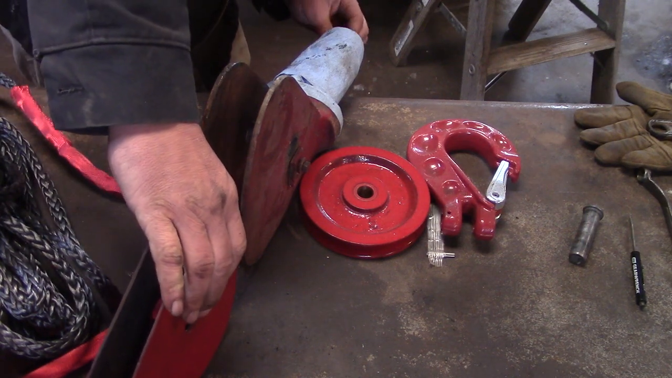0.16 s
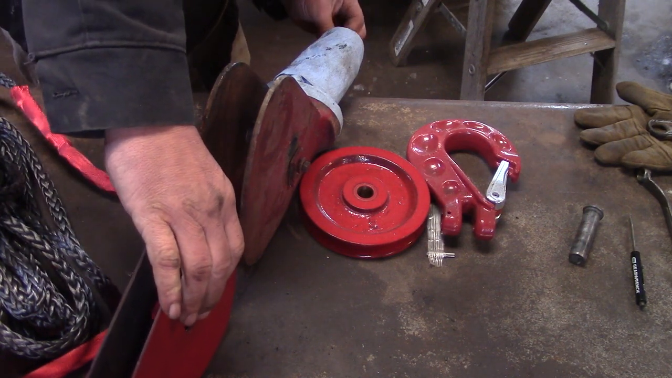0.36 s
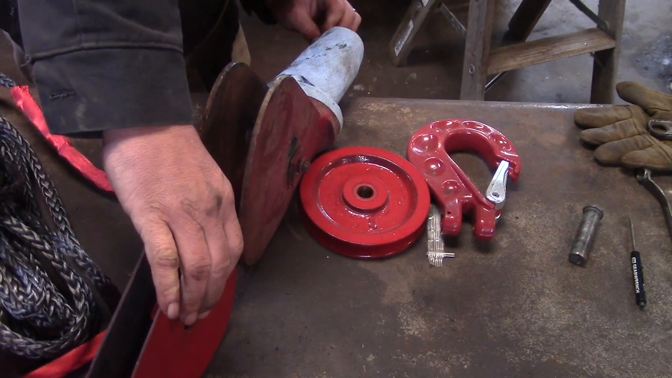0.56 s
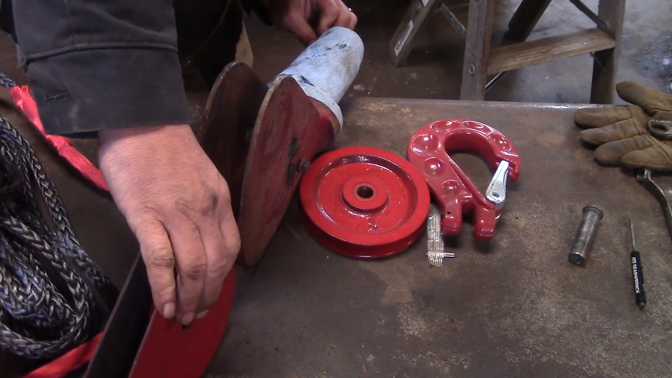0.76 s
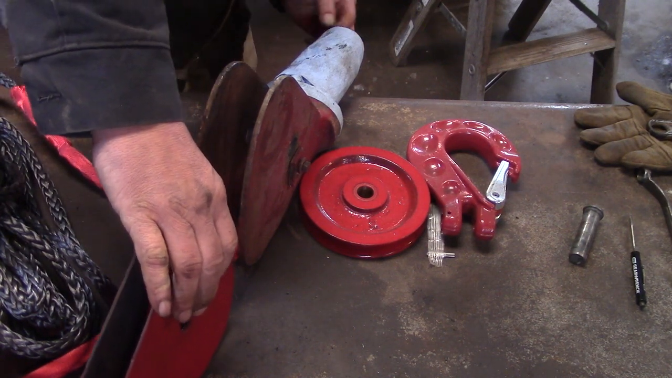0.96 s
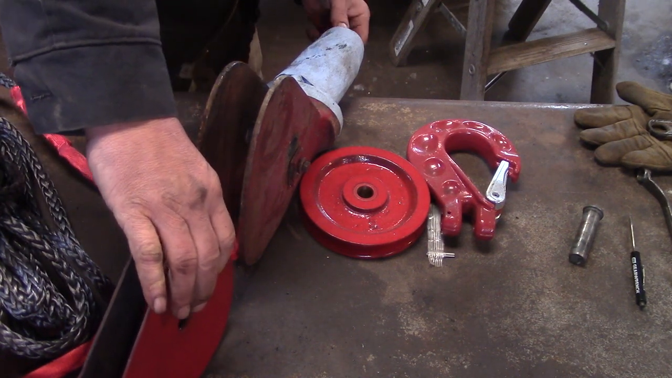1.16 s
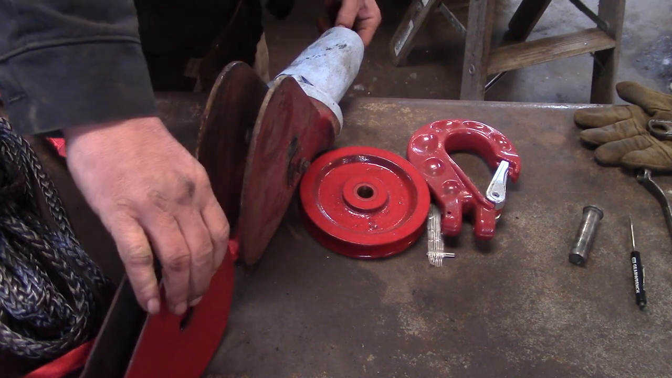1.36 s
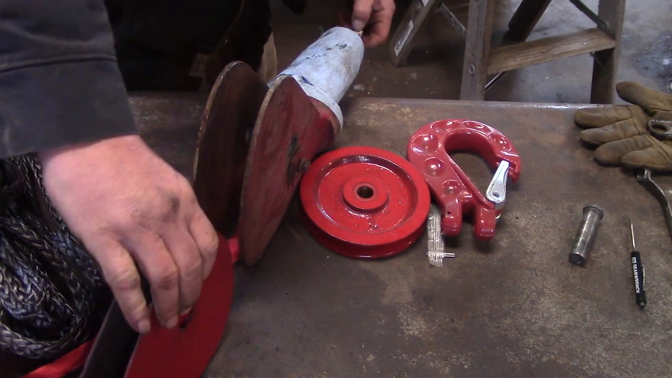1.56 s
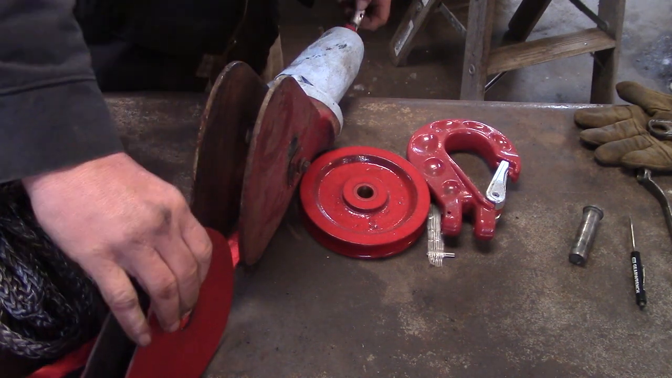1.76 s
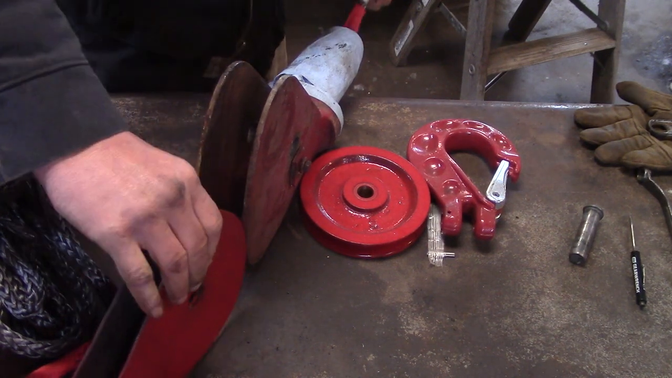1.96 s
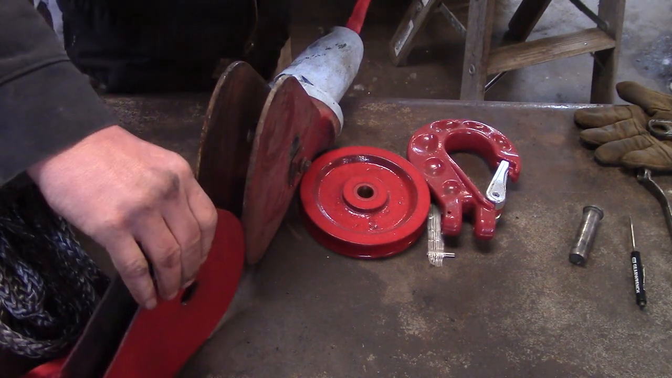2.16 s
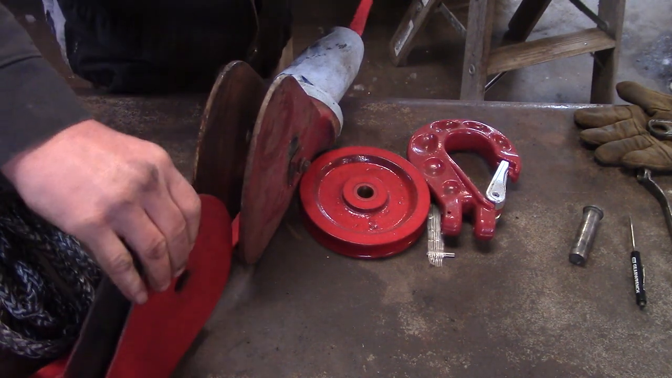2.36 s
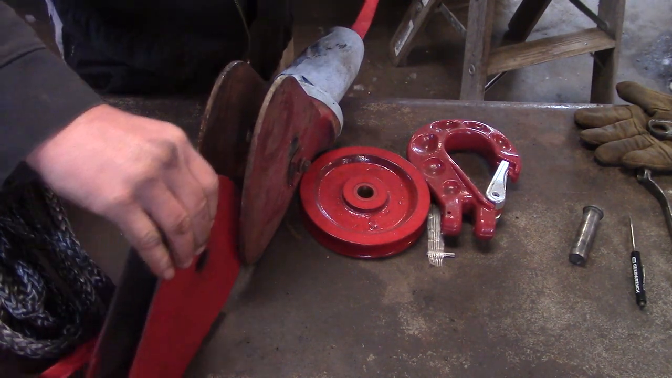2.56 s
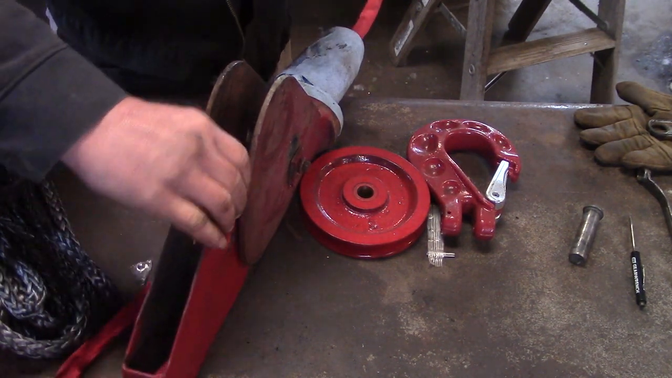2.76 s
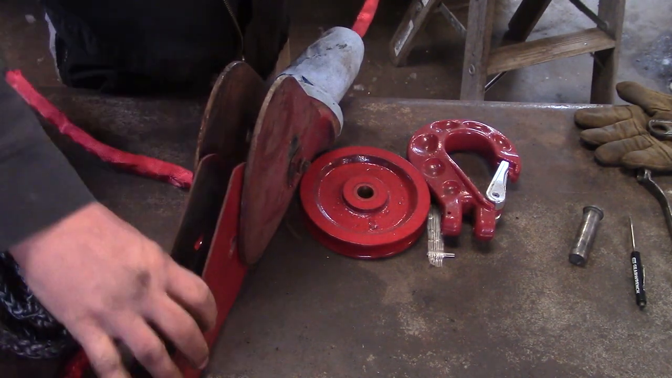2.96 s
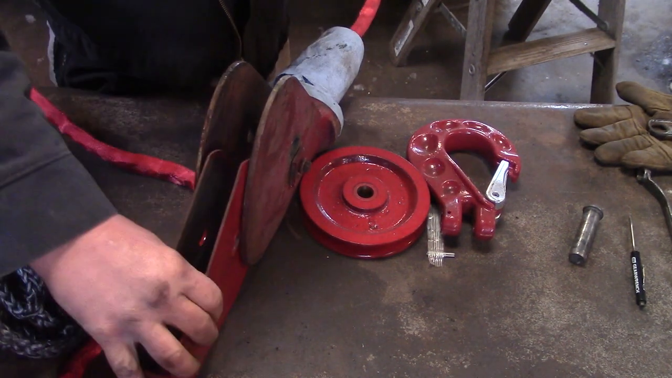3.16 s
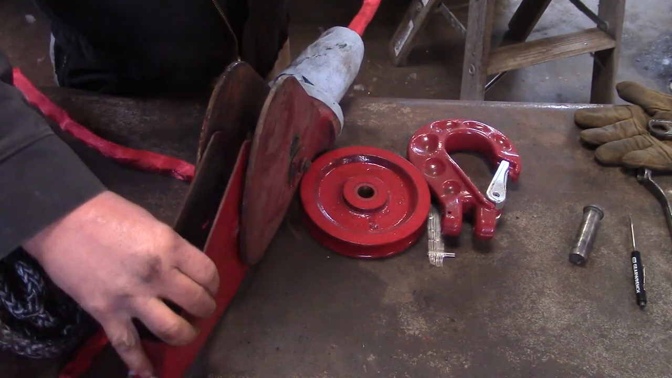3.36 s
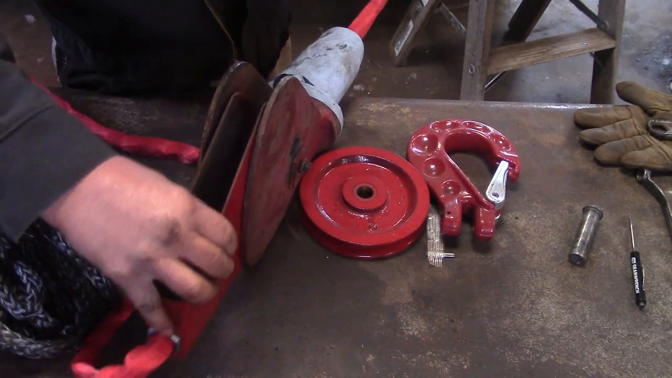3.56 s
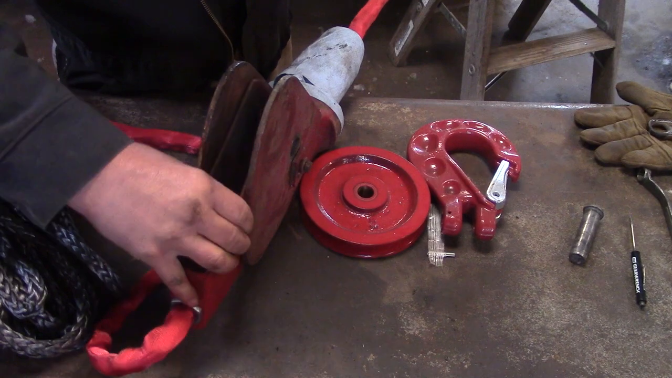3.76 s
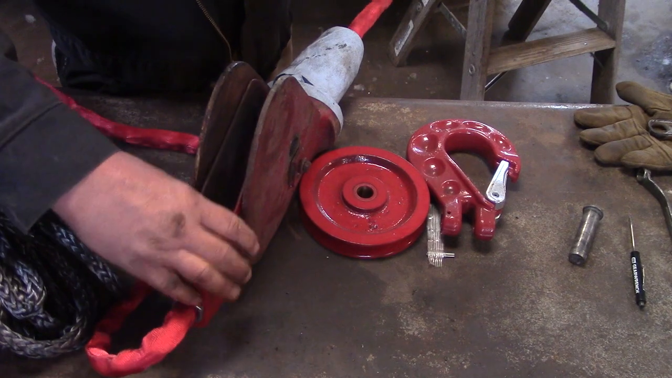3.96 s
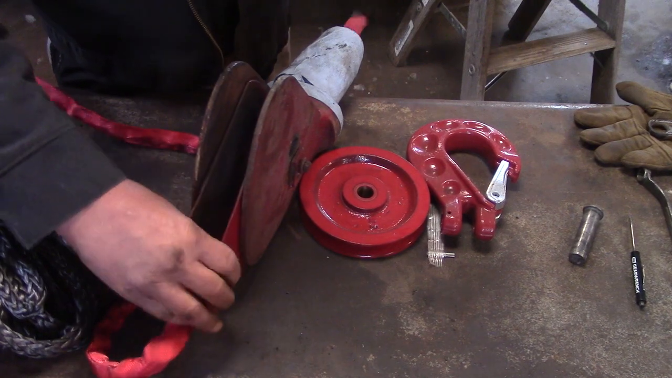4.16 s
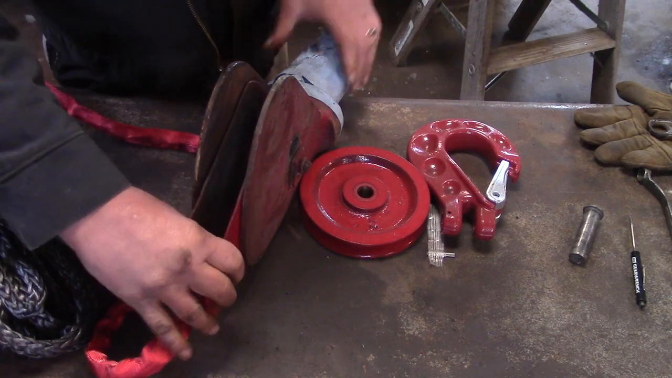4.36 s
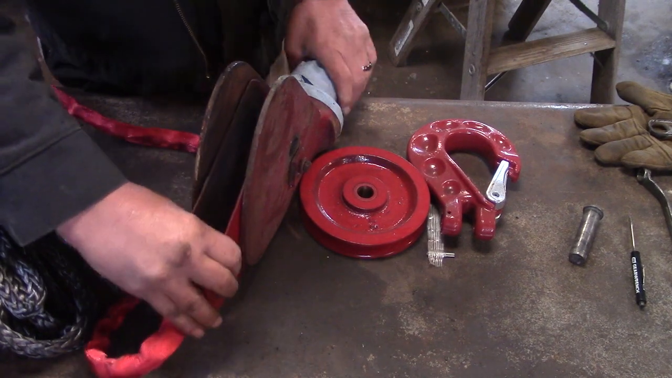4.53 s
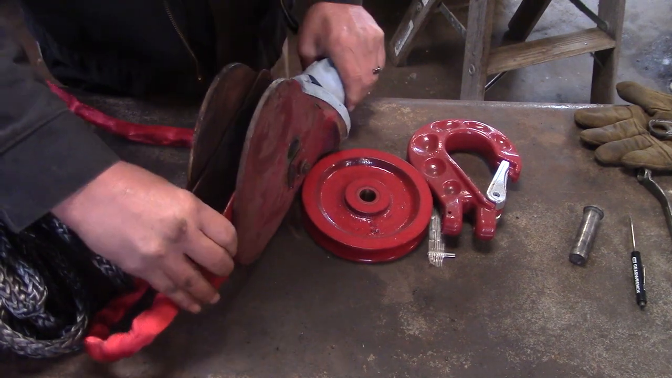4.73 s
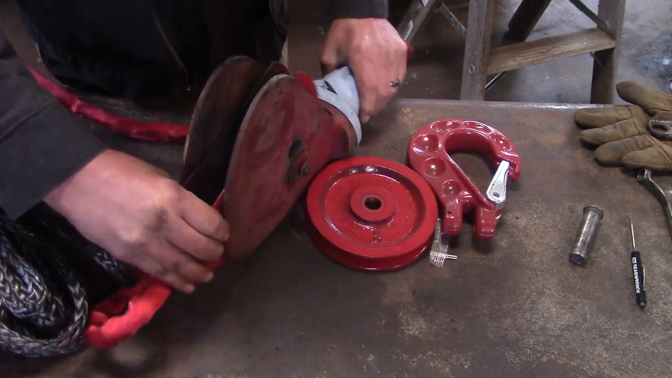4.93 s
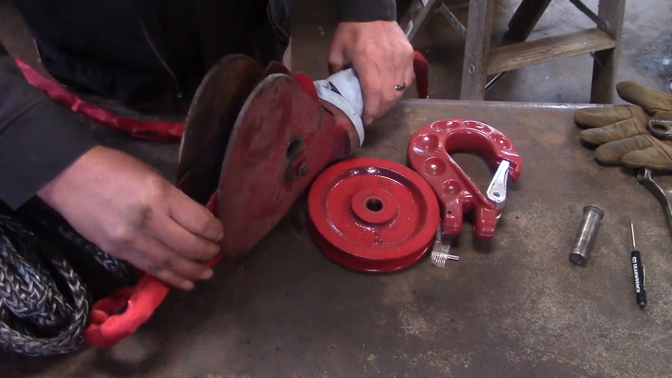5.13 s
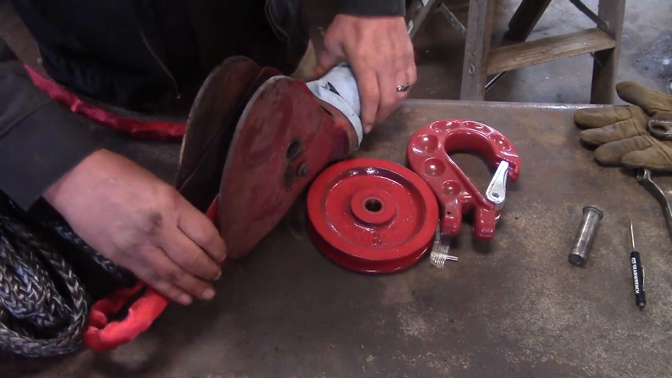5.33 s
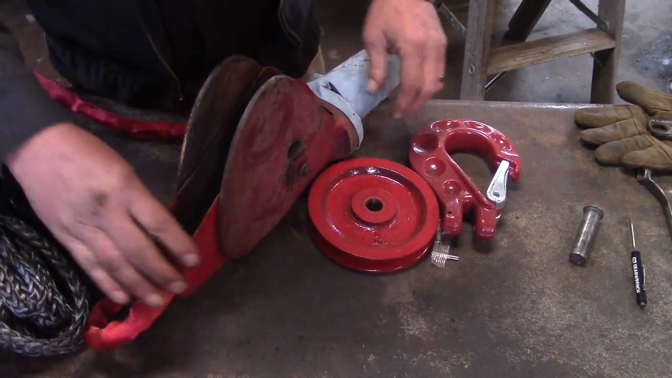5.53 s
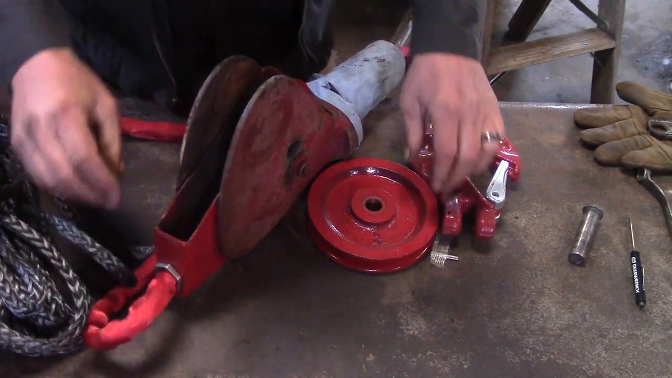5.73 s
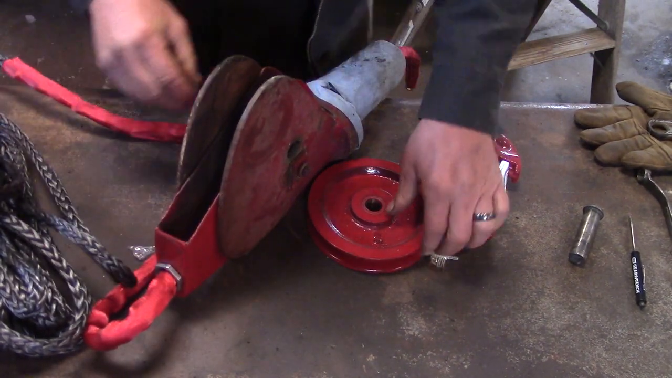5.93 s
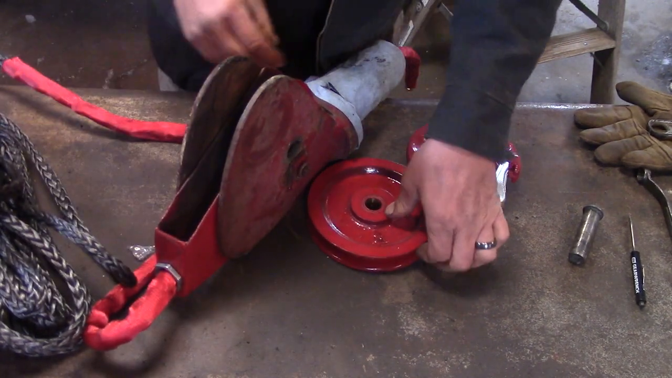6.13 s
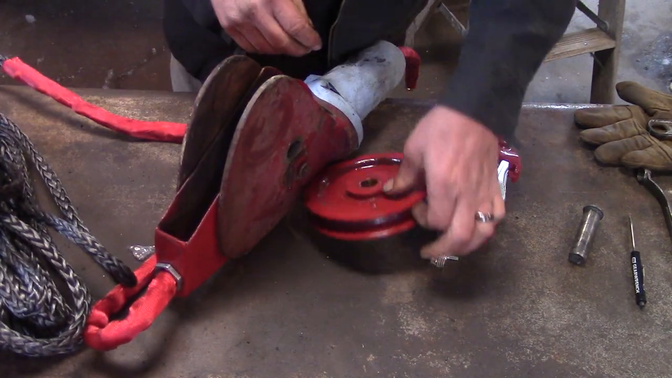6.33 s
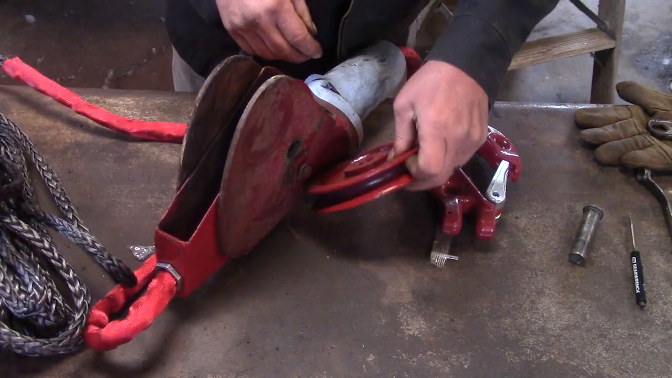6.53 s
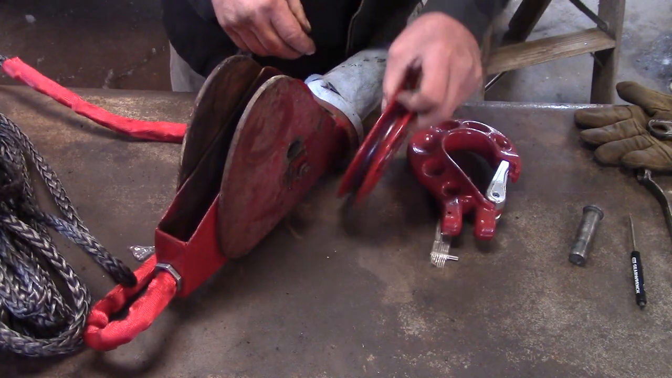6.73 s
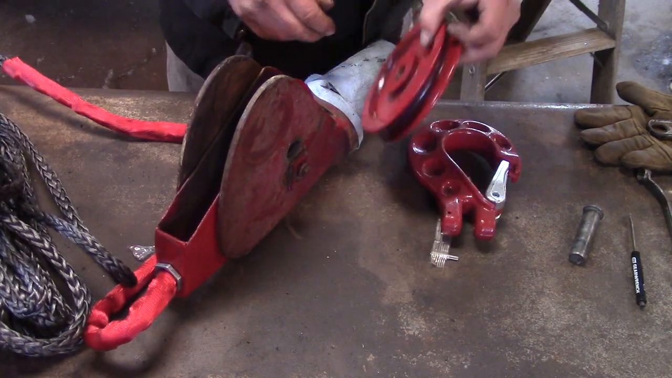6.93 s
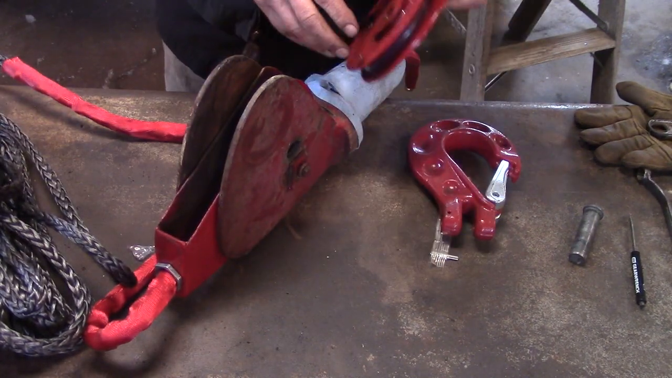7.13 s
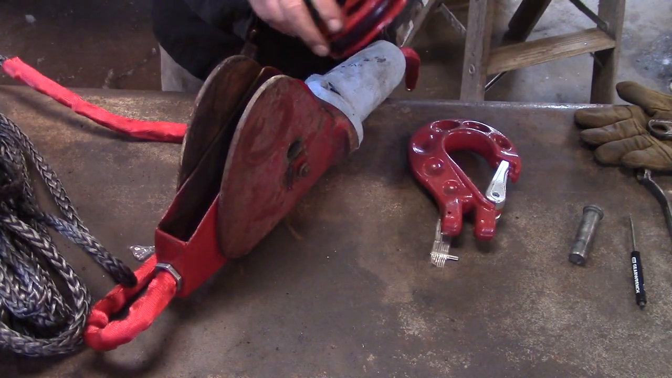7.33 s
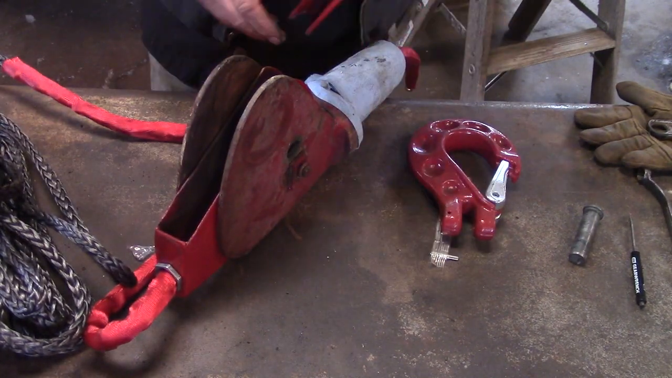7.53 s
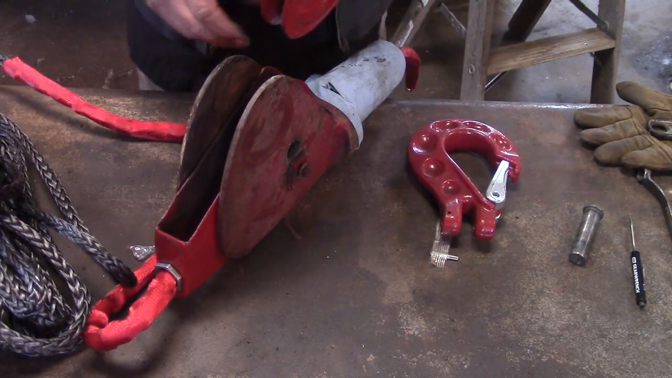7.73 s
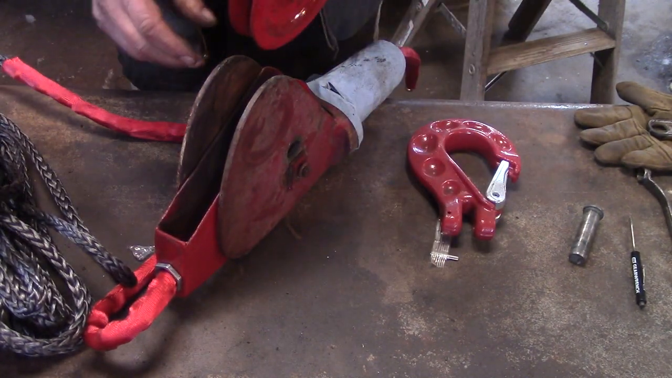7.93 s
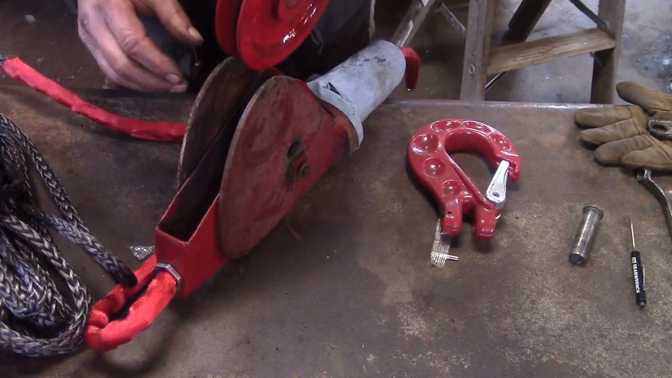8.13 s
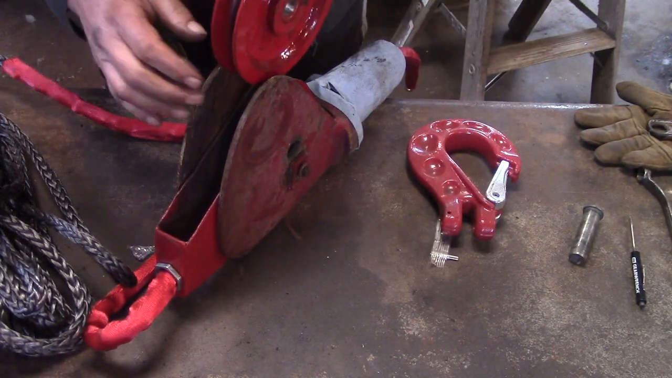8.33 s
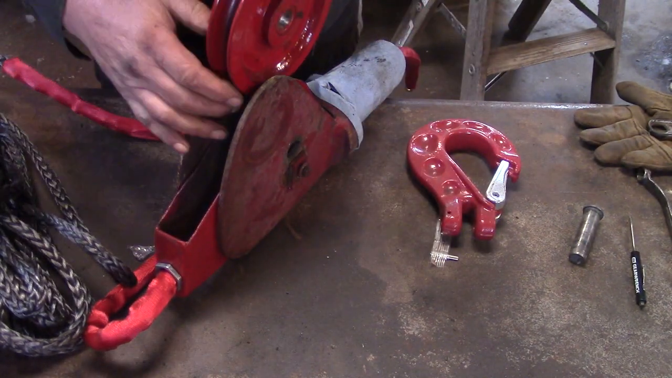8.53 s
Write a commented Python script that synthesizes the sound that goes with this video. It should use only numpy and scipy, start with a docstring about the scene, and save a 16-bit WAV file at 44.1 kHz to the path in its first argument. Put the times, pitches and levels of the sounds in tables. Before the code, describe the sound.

Close to a workbench, hands shift steel pieces. Almost two seconds of quiet rustle and tiny ticks lead to hard metallic clangs, scrapes and dull, boomy bench knocks as plate meets housing. After a brief lull, parts drag and clink in a lighter burst. A wheel then rings softly as it rubs the bench and lifts off with a barely heard squeak. Dry, small workshop with faint steady air.

```python
"""Workshop air, a steady coloured noise, is heard throughout; friction noise of handling strokes joins it.
A few small parts clink. Then a steel plate is fed into a heavy steel housing on the bench: both ring as
struck modal bodies, scrape as gritty noise, and knock the bench top, which adds a low boom.
Next the housing is dragged and small solid parts clink, ringing short high modes.
Last a pulley wheel is slid and lifted, with a faint squeak, a wavering near-sine."""
import sys
import numpy as np
from scipy import signal
from scipy.fft import rfft, irfft, next_fast_len
from scipy.io import wavfile
from scipy.ndimage import uniform_filter1d

SR = 44100
rng = np.random.default_rng(int(sys.argv[2]) if len(sys.argv) > 2 else 0)


def invert_db(level):
    """Linear amplitude ratio for a level in decibels (20 dB per decade), elementwise."""
    return 10 ** (np.asarray(level, dtype=float) / 20)


def materialize(psi):
    """Save the field psi as 16-bit PCM at rate SR to the path in sys.argv[1].

    A 1-D psi becomes a single channel; in a 2-D psi each row is a channel.
    """
    bounded = np.clip(np.atleast_2d(psi).T, -1, 1)
    quanta = np.round(bounded * 32767).astype(np.int16)
    wavfile.write(sys.argv[1], SR, quanta)


N = 378819  # length in samples

# All levels are relative: each source is weighted again in the mix.
# Background noise spectrum: [f/Hz, level/dB per Hz]
AIR_SPECTRUM = [(15, -46), (25, -33.5), (160, -3), (260, -3.5), (289, -3.5), (523, -3), (648, -3),
                (919, -6.5), (2850, -16), (3930, -16.5), (9810, -28), (11800, -26.5), (15500, -33.5)]
AIR_DB = -53.5  # rms level of the air in the mix
# Likeness of the air at left and right: [f/Hz, correlation]
AIR_LIKENESS = [(60, 0.34), (180, 0.76), (550, 0.86), (1650, 0.81), (4970, 0.86), (15000, 0.83)]
# Strokes of rope, steel and hands over steel and bench:
# [nominal start t/s, hold t/s, scrape level/dB, rumble level/dB re scrape, hiss level/dB re scrape]
STROKES = [(0.131, 0.091, -52, 1, -12), (0.262, 0.056, -50.5, 5, -11.5), (0.5, .02, -56, 4, -10),
           (0.63, 0.018, -52, -24, -3), (.83, .02, -72, 11, 7.5), (0.937, 0.022, -55, -10, -9),
           (1.195, 0.13, -54.5, 1.5, -16), (1.52, 0.046, -60, 5.5, -11), (1.58, 0.23, -56, -8.5, 0.5),
           (1.867, 0.086, -42.5, 5, 1), (1.92, 0.089, -32.5, 6.5, -4), (1.99, .12, -33.5, 3, -21),
           (2.307, 0.01, -36.5, 3, -8.5), (2.425, 0.064, -25.5, -25, -25), (2.521, 0.19, -25.5, 0, -11.5),
           (2.675, 0.11, -22, -1, -7.5), (2.747, .07, -14.5, 6, -28), (2.882, 0.077, -30, 11.5, -9.5),
           (3.043, 0.17, -34, 4, -15.5), (3.167, 0.12, -29.5, -11.5, -21.5), (3.275, 0.21, -44.5, 6, -8),
           (3.54, 0.13, -37, 4.5, -15), (3.846, 0.054, -16, -5.5, -31.5), (3.913, 0.083, -28, 11, -24.5),
           (4.043, 0.13, -45.5, 10.5, -17.5), (4.16, 0.17, -46.5, 13.5, -17.5),
           (4.46, 0.22, -48, -1.5, -4.5), (4.565, 0.094, -48, -10, -14), (4.63, 0.085, -36, 3, -12),
           (4.755, 0.26, -34.5, 4.5, -8), (4.967, 0.01, -19.5, 9.5, -25), (5.027, 0.07, -26, 2, -13),
           (5.128, 0.093, -37.5, 3, -25), (5.213, 0.023, -35, 0, -4.5), (5.258, 0.074, -31, 0, -22),
           (5.336, 0.12, -54.5, 20, -24), (5.657, 0.041, -45.5, -8, -8), (5.729, 0.047, -41, -3.5, -10.5),
           (5.86, 0.37, -55, -1.5, -20), (6.064, 0.12, -42, 0, -9), (6.104, .27, -37.5, 0, -11.5),
           (6.404, 0.065, -35, 7, -14), (6.684, 0.047, -38.5, 5.5, -25), (6.79, 0.15, -56, 8, -15),
           (6.99, .15, -67, 8, -8)]
# Spectrum of sliding and of the dense overtones in every blow: [f/Hz, level/dB per Hz]
GRIT_SPECTRUM = [(35, -46), (60, -96.5), (110, -25), (312, 7), (673, 10.5), (910, 6), (1200, -0.5),
                 (1700, 0.5), (3420, -3.5), (8090, -3), (8870, -4.5), (14500, -20.5), (15500, -26.5)]
# Bench top modes: [f/Hz]; and [level/dB, t60/s]
BENCH_HZ = [132, 203, 264, 314, 356, 420, 510, 605, 715, 830]
BENCH_MODES = [(-9, 0.21), (3.5, 0.08), (-2, 0.38), (-1.5, 0.21), (2, 0.15), (-3, 0.14), (-0.5, 0.13),
               (-5.5, 0.078), (-15.5, .15), (-7.5, 0.25)]
# Small solid parts touching: [t/s, dry tick level/dB, ring level/dB re tick, place 0-3 round the part]
CLINKS = [(0.5072, -60.5, -4, .5), (0.651, -54, 0, 1.45), (0.6994, -59, -11, 2.01), (0.7272, -56, -7, 1.7),
          (0.841, -48, -24, 1.9), (0.8694, -60, -12, .1), (1.5424, -44, -25, 2.01),
          (4.6436, -32, -23, 1.77), (4.7017, -36.5, -7.5, 2.1), (4.779, -33, -4.5, 1.53),
          (4.816, -34, -10, 1.3), (4.8908, -27, -13, 1), (4.973, -27.5, -2.5, 2.44), (4.986, -25, -10, 2.8),
          (4.997, -19, -15, 2.7), (5.0629, -31, -1, .05), (5.0876, -23, -14.5, 1.46),
          (5.1937, -43.5, -4, 2.7), (5.232, -22.5, -13.5, 2.5), (5.2893, -21, -6, 2.57),
          (5.3101, -37, -1, 0.96), (5.3919, -48, 7.5, 2.82), (6.1986, -36.5, -14, 1.2),
          (6.239, -47.5, 3, 1.3), (6.2682, -41.5, 1.5, 1.28), (6.2894, -65, -14.5, 1.4),
          (6.3094, -49, 8.5, 0.52), (6.3223, -40, 0.5, 1.4), (6.365, -50, 9, 1.1), (6.3894, -52, 7, .7),
          (6.4314, -38, 13.5, 0.13), (6.4436, -34, 7, 1.42), (6.4744, -28.5, -8.5, 1.54),
          (6.6494, -59, -6, 1.9), (6.6997, -55, 7, 1.36), (6.7171, -40, 1.5, 2.8), (6.7344, -42, 2, 1.5),
          (6.7444, -36.5, 1, 0.17), (6.7594, -57, -7, .3), (6.8094, -43.5, -11, 0.054),
          (7.2794, -57, -6, .9), (7.4494, -61.5, -5, 1.01), (7.6594, -69, -10, .05)]
# Modes of the wheel, also rung by every clink: [f/Hz]; and [level/dB, t60/s]
WHEEL_HZ = [1180, 1570, 1770, 2210, 2370, 2870, 3063, 3930, 6170, 7450, 8800, 9530, 9930, 10400, 10700,
            11500, 12200, 13400, 14100, 15000]
WHEEL_MODES = [(-5, 0.11), (-21, 0.11), (-1, 0.023), (-5, 0.074), (-10, 0.11), (-7, 0.087), (-11, 0.061),
               (3.5, 0.057), (-5, 0.041), (-21, 0.052), (0, 0.045), (-13.5, 0.056), (-7.5, 0.045),
               (-11.5, 0.037), (-10, 0.063), (-6, 0.039), (-7.5, 0.047), (-9, 0.034), (-13, 0.047),
               (-16, 0.028)]
# Dense overtones by octave: [centre f/Hz, t60/s before the damping factor of each kind of blow]
OVERTONE_DECAYS = [(90, 0.3), (180, 0.4), (360, 0.4), (720, 0.3), (1400, 0.48), (2800, 0.19), (5600, 0.095),
                   (11200, 0.025)]
# Heavy parts landing on the bench:
# [t/s, peak level/dB near 250 Hz, level/dB re that near 700 Hz, and near 2500 Hz]
KNOCKS = [(1.892, -38.5, 4, -0.5), (2.171, -24.5, 11.5, -1), (2.763, -9.5, 12, -29.5),
          (2.82, -14, -12, -16.5), (2.882, -8.5, 8.5, -4), (3.067, -18, -6, -5), (3.103, -14.5, -6, -15.5),
          (3.184, -17.5, 0.5, -13.5), (3.301, -24, 10.5, -12.5), (3.861, -8.5, 13, -0.5),
          (4.621, -27.5, -27, -9.5), (4.702, -21.5, 0.5, -12), (4.985, -12.5, 6, -2), (5.09, -29, 0, 0),
          (5.291, -15.5, 1.5, -14), (5.39, -24, -12, -9.5), (5.674, -37.5, -7, -4), (5.772, -40, -1, -7),
          (6.198, -42.5, 5, 0), (6.428, -35, 20, 9.5), (6.467, -41, -8, -8), (6.62, -36.5, 5.5, -35),
          (6.719, -29, 7, 4.5), (6.739, -46, 21.5, 14.5)]
# Plate against housing, as the plate answers: [t/s, peak level/dB near 3 kHz,
# hardness: level/dB re peak near 8 kHz, low ring level/dB re peak, place 0-3 round the rim]
CLANKS = [(1.9475, -28, 6.5, 1.5, .5), (1.978, 4, -18.5, -5.5, 1.3), (2.0285, -9.5, -46, 9, 1.4),
          (2.0826, -17, -26, 9, 1.01), (2.1676, -35, -12, -14.5, .8), (2.3347, -29, -0.5, 8.5, .6),
          (2.3818, 2, 5, -17.5, 2.45), (2.417, -5.5, 1.5, -0.5, 2.2), (2.5305, -7, -4, -9.5, 2.1),
          (2.5717, -12.5, -2.5, -4, 2.3), (2.6668, -6, -17.5, -11.5, 1.8), (2.7086, -6.5, -3.5, -27, 1.6),
          (2.7394, -2.5, -22, -16, 2.8), (2.7632, -4.5, -3.5, -1.5, 1.3), (2.884, -15, -12, -7.5, .1),
          (2.9178, -10.5, -12, -7, .2), (3.0659, -27, -3, -5, 0.0997), (3.119, -20, -5.5, -6, 2.8),
          (3.2002, -1, -2.5, -25.5, 2.6), (3.2096, -11, -18.5, -30, 1.01), (3.2894, -19.5, -10, -3.5, .9),
          (3.4464, -13.5, -10, -16, 1.4), (3.4856, -14.5, 5.5, -11.5, 1.2), (3.5811, -6, -18, -9, .9),
          (3.7369, -21, -39.5, -17, .1), (3.7548, -5.5, -25.5, -11.5, .5), (3.864, -5, -15.5, -4.5, .5),
          (3.8848, -22.5, -15.5, -16, .3), (3.9064, -2.5, -11, -4, 1.3), (3.931, -3, -23, -4.5, .6),
          (3.9494, -8.5, -64, -14.5, .2), (3.9744, -25.5, -18.5, -12, .5), (4.0898, -20, -32, -5, 1.3),
          (4.152, -9, -10, -6, 1.1), (4.223, -21.5, -22, -1, 1.01), (4.25, -30, 1.5, 0, .5)]
# Plate modes: [f/Hz]; and [level/dB, t60/s before grip]
PLATE_HZ = [549, 587, 877, 1028, 1497, 1850, 1900, 2130, 2326, 2907, 3365, 3458, 3623, 4045, 4237, 4670,
            5152, 5270, 5712, 5920, 6142, 7620, 7962, 8581, 9814, 10540, 11530]
PLATE_MODES = [(6, 0.25), (-0.5, 0.12), (-1, 0.41), (-20.5, 0.5), (-1.5, 0.69), (-8.5, 0.18), (-9.5, 0.27),
               (-4.5, 0.25), (-11, 0.35), (-6, 0.22), (-12, 0.36), (-11, 0.2), (-10, 0.23), (-13.5, 0.16),
               (-10.5, 0.11), (-8, 0.12), (-14, 0.076), (-2, 0.089), (-13.5, 0.15), (-13.5, 0.3),
               (-17, 0.2), (-15.5, 0.11), (-16.5, 0.13), (-19.5, 0.14), (-17.5, 0.21), (-20, 0.078),
               (-23, 0.1)]
# Blows that ring the housing: [t/s, peak level/dB near 2.7 kHz,
# hardness: level/dB re peak near 3.3 kHz, low ring level/dB re peak, place 0-3 round the body]
RINGS = [(1.9776, -7.5, -13.5, -7.5, 2.3), (2.384, -13, 5.5, -10.5, 1.96), (2.5296, -13, -11.5, -24.5, 1.3),
         (2.5726, -25, -8, -8.5, 0.6), (2.664, -21.5, -7.5, -19, 1.3), (2.687, -20.5, 6, -15.5, 1.7),
         (2.7032, -16, 8, -15, 1.4), (2.7331, -14.5, 3, -9, 1.9), (2.766, -18, 2, 2, .05),
         (2.9614, -24.5, -1, -7.5, 0.96), (3.201, -24, 5, -4, 1.8), (3.2086, -22.5, -1, -6.5, 1.9),
         (3.448, -26, -18, -22.5, 1.01), (3.4806, -31.5, 2, -2.5, 0.57), (3.5798, -13, 2, -8.5, 2.18),
         (3.7563, -24, 10.5, -2, 1.83), (3.8627, -12, -11, -3, 0.93), (3.9474, -18, -9, 8, 0.45),
         (4.0936, -24, -17, -8, 0.8), (4.1108, -47, -1.5, 17, 1.5), (4.1551, -20, 1.5, 3.5, 1.7),
         (4.2238, -42.5, -17, 18, 2.35)]
# Housing modes: [f/Hz]; and [level/dB, t60/s before grip]
HOUSING_HZ = [797, 1136, 1628, 1690, 1728, 2552, 2611, 2724, 2968, 3235, 3298, 3714, 3864, 3962, 4090, 5460]
HOUSING_MODES = [(1, 0.28), (1.5, 0.41), (-11.5, 0.37), (-1.5, 0.24), (-6, 0.36), (-3.5, .1), (-9.5, 0.18),
                 (-4, 0.24), (-9.5, 0.37), (-11.5, 0.16), (-4, 0.2), (-7, 0.11), (-13, .13), (-16, 0.11),
                 (-16.5, .17), (-11.5, 0.093)]
# Hand and contact damping the steel: [t/s, factor on the decay rate]
GRIP = [(1.9, 0.57), (2.12, 1.31), (2.17, 3.5), (2.3, 2.3), (2.4, 0.82), (2.66, 1.13), (2.76, 1.9),
        (2.95, 1.8), (3.2, 1.14), (3.4, 1.45), (3.6, 2), (3.8, 1.65), (3.97, 2.34), (4.05, 0.54),
        (4.12, 1.3), (4.3, 1.2), (4.5, 1.4)]
# A faint thin squeak: [t/s, f/Hz, rms level/dB]
SQUEAK = [(5.93, 4200, -75), (5.944, 4400, -70), (6.008, 4240, -59.5), (6.036, 4380, -60),
          (6.07, 4170, -73)]
# Reflections that differ left and right: [f/Hz, level/dB re direct sound]
SIDE_SPECTRUM = [(60, -21.5), (120, -51), (240, -56.5), (480, -38.5), (950, -24), (1890, -22.5),
                 (3770, -21), (7520, -20), (15000, -28)]

STROKE_RISE_S, STROKE_RISE_SHARE = 0.016, 0.23  # rise time = the first + this share of the hold
STROKE_RISE_DB, STROKE_FADE_DB_PER_S = 22.5, 259.5
DEEP_DB = -10.5  # deepest sliding range, re rumble
RATTLE_PER_S, RATTLE_SPREAD_DB = 90, 9.5
PLACE_DB = 10  # how far the place of a blow lifts or lowers each of three groups of modes
WAVER, WAVER_S = .22, .035  # depth and pace of each mode's wavering
BOOM_HZ, BOOM_WIDTH_HZ, BOOM_T60 = 133.1, 20.5, 0.56
BOOM_KNOCK_DB, BOOM_CLANK_DB, BOOM_RUB_DB = -18, -35.5, -15
WHEEL_FROM_S, WHEEL_TO_S = 6.19, 6.5  # the wheel chatters on the bench


def evened(x):
    """Normalises the mean power: rms 1."""
    return x / np.sqrt(np.mean(x ** 2) + 1e-20)


def read(points, hz):
    """Interpolates a spectrum linearly on a logarithmic frequency axis."""
    f, value = np.transpose(points)
    return np.interp(np.log(hz + 1), np.log(f + 1), value)


def colour(x, points):
    """Linear filtering: multiplies the Fourier spectrum by a response in dB."""
    size = next_fast_len(N)
    response = invert_db(read(points, np.fft.rfftfreq(size, 1 / SR)))
    return irfft(rfft(x, size) * response, size)[..., :N]


def band(x, edges):
    """Third-order band-pass filtering between two frequencies in Hz."""
    return signal.sosfilt(signal.butter(3, edges, "band", fs=SR, output="sos"), x)


def octave(x, hz):
    """Octave-band filtering around hz."""
    edges = [hz / np.sqrt(2), hz * np.sqrt(2)]
    return signal.sosfilt(signal.butter(2, edges, "band", fs=SR, output="sos"), x)


def train(s, sizes):
    """Impulsive excitation: impulses of the given sizes at times s."""
    out = np.zeros(N)
    np.add.at(out, np.round(np.asarray(s) * SR).astype(int), sizes)
    return out


def draining(power, t60):
    """Exponential decay of stored energy, 60 dB in t60."""
    return signal.lfilter([1], [1, -1e6 ** (-1 / (t60 * SR))], power)


def blow_spectra(rows, centres_hz, columns):
    """Excitation spectrum of each blow: returns the times, and level in dB as a function of Hz."""
    s, level_db, *rel_db = np.transpose(rows)
    shape = (np.array([0 * s] + rel_db) + level_db)[columns].T  # column 0 is the level itself
    return s, lambda hz: np.array([read(list(zip(centres_hz, row)), hz) for row in shape])


def placed(rows):
    """Modal participation: ring and place become levels of three mode groups; each place favours one."""
    *head, ring_db, place = np.transpose(rows)
    groups = [ring_db + PLACE_DB * np.cos(2 * np.pi * (place - k) / 3) for k in range(3)]
    return np.transpose(head + groups)


def waver():
    """Slow complex modulation by loose contact with neighbours: bends a mode's strength and phase."""
    at = np.arange(0, N / SR + 2 * WAVER_S, WAVER_S)
    a, b = rng.standard_normal((len(at), 2)).T
    return 1 + WAVER * np.interp(np.arange(N) / SR, at, a + 1j * b)


def rung(s, blow_db, modes_hz, modes, rub, spot_db, clock, rub_hz=3000):
    """Modal superposition: blows add energy that drains on the given clock; rubbing drives the modes too."""
    luck, phase = rng.standard_normal((len(s), len(modes))), rng.random(len(modes))
    step = 8  # samples per energy update
    t, out = np.arange(N) / SR, np.zeros(N)
    at = np.round(s * SR / step).astype(int)
    for k, (hz, (db, t60)) in enumerate(zip(modes_hz, modes)):
        # where the blow lands varies each mode's share, most for the fine high modes
        spot = spot_db * min(1, (hz / 2500) ** 2) * luck[:, k]
        log_blows = np.full(len(t[::step]), -np.inf)
        log_blows[at] = (blow_db(hz) + db + spot) * np.log(10) / 10
        drain = np.log(1e6) * clock[::step] / t60
        log_energy = np.logaddexp.accumulate(log_blows + drain) - drain
        swing = np.repeat(np.exp(log_energy / 2), step)[:N]

        r, w = 1000 ** (-1 / (t60 * SR)), 2 * np.pi * hz / SR
        swing = signal.lfilter([w / 2], [1, w / 2 - 1], swing)  # softens the onset
        out += swing * (waver() * np.exp(2j * np.pi * (hz * t + phase[k]))).imag
        # rubbing is slow and favours low modes
        drive = invert_db(db) * min(1, rub_hz / hz) ** 14.0 * np.sqrt(1 - r * r) * rub
        out += signal.lfilter([0, np.sin(w)], [1, -2 * r * np.cos(w), r * r], drive)
    return out


def struck(s, blow_db, knee_hz, slope, damping, lumpy_db):
    """High modal density: many close overtones act as noise, dying by octave, thinner under the knee."""
    hz_grid = np.arange(20, SR / 2, 24.)
    small_modes = np.transpose([hz_grid, lumpy_db * rng.standard_normal(len(hz_grid))])
    hum = colour(colour(rng.standard_normal(N), GRIT_SPECTRUM), small_modes)
    out = np.zeros(N)
    for hz, t60 in OVERTONE_DECAYS:
        power = draining(train(s, invert_db(2 * blow_db(hz))), t60 / damping)
        # low octaves need a cycle to build
        rise = signal.lfilter([hz / SR], [1, hz / SR - 1], np.sqrt(power))
        out += min(1, hz / knee_hz) ** slope * rise * evened(octave(hum, hz))
    return out


def reflections(x, t60):
    """Exponentially decaying echoes: random-sign taps, one in every 20 samples; energy 1."""
    taps = np.zeros(SR // 2)
    at = np.arange(100, SR // 2 - 20, 20)
    signs = rng.choice([-1., 1.], len(at))
    taps[at + rng.integers(0, 20, len(at))] = signs * invert_db(-60 * at / SR / t60)
    return signal.oaconvolve(x, taps / np.linalg.norm(taps))[:N]


def air():
    """Partially coherent random noise: steady, with soft patches, partly shared by both channels."""
    frames, hz = N // 256 + 5, np.fft.rfftfreq(1024, 1 / SR)
    a, b, c, d, patches = rng.standard_normal((frames, 513, 5)).T
    patches = evened(uniform_filter1d(uniform_filter1d(patches, 12, 0), 14, 1))
    same = read(AIR_LIKENESS, hz)[:, None]
    left = a + 1j * b
    right = same * left + np.sqrt(1 - same ** 2) * (c + 1j * d)
    z = np.array([left, right]) * invert_db(read(AIR_SPECTRUM, hz)[:, None] + 1.1 * patches)
    return invert_db(AIR_DB) * evened(signal.istft(z, nperseg=1024, noverlap=768)[1][:, :N])


def slide_levels():
    """Friction envelopes, low to high range: strokes rise, hold and fade; each has its rumble and hiss."""
    t, power = np.arange(0, N / SR + .002, .001), np.zeros((4, 1))
    for start, hold, db, weight_db, hiss_db in STROKES:
        since = t - start
        rise = STROKE_RISE_S + STROKE_RISE_SHARE * hold  # long strokes rise more slowly
        full = STROKE_RISE_S + STROKE_RISE_SHARE * hold / 2
        rise_db = np.minimum(STROKE_RISE_DB * (since - full) / rise, 0)
        fade_db = STROKE_FADE_DB_PER_S * np.maximum(since - STROKE_RISE_S - hold, 0)
        range_db = np.array([[weight_db + DEEP_DB], [weight_db], [0], [hiss_db]])
        power = power + invert_db(2 * (db + rise_db - fade_db + range_db))
    return [np.interp(np.arange(N) / SR, t, np.sqrt(p)) for p in power]


def grains(per_s, spread_db):
    """Asperity contact: rough surfaces catch, giving noise in short uneven bursts."""
    sizes = invert_db(spread_db * np.minimum(rng.exponential(1, N), 4))
    catches = sizes * (rng.random(N) < per_s / SR)
    power = signal.lfilter([1], [1, -.992], catches ** 2) + 1
    return evened(np.sqrt(power) * rng.standard_normal(N))


def sliding(rough, levels):
    """Friction noise: gritty noise in four frequency ranges, each on its own level."""
    x = colour(rough, GRIT_SPECTRUM)
    ranges = ([150, 458], [450, 897], [950, 3650], [5000, 16000])  # Hz
    return sum(level * evened(band(x, edges)) for edges, level in zip(ranges, levels))


def bench(rough, low, t):
    """Modal response of the bench top to knocks and to heavy sliding."""
    blows = blow_spectra(KNOCKS, [250, 700], [0, 1])
    return rung(*blows, BENCH_HZ, BENCH_MODES, invert_db(-3.5) * rough * low, 1.3, t)


def boom(low):
    """Narrow-band resonance: the whole bench top shudders at knocks and clanks; heavy sliding feeds it."""
    t, r = np.arange(N) / SR, np.exp(-np.pi * BOOM_WIDTH_HZ / SR)
    blows = np.zeros(N)
    for rows, db in ((KNOCKS, BOOM_KNOCK_DB), (CLANKS, BOOM_CLANK_DB)):
        s, level_db, *_ = np.transpose(rows)
        blows += train(s, invert_db(2 * (level_db + db)))
    power = draining(blows, BOOM_T60) + (invert_db(BOOM_RUB_DB) * low) ** 2
    noise = [1, 1j] @ rng.standard_normal((2, N))
    shake = signal.lfilter([1], np.convolve([1, -r], [1, -r]), noise)
    swing = uniform_filter1d(np.sqrt(power), size=400, origin=199)
    return swing * evened((shake * np.exp(2j * np.pi * BOOM_HZ * t)).real)


def ticks():
    """Dry contact noise of small parts: dense, heavily damped overtones."""
    return struck(*blow_spectra(CLINKS, [7000], [0]), 3900, 0.35, 2.8, 8.4)


def wheel(rough, mid, t):
    """Modal ringing of small parts at each clink, and of the wheel rubbed along the bench."""
    blows = blow_spectra(placed(CLINKS), [1700, 4000, 10000], [1, 2, 3])
    rub = invert_db(-18) * rough * mid * (t > WHEEL_FROM_S) * (t < WHEEL_TO_S)
    return rung(*blows, WHEEL_HZ, WHEEL_MODES, rub, 2.5, t, rub_hz=9400)


def rattle():
    """Repeated impact: loose steel chatters as it slides, in sparse uneven taps, a few of them large."""
    sizes = invert_db(RATTLE_SPREAD_DB * np.minimum(rng.exponential(1, N), 2.5))
    return evened(sizes * (rng.random(N) < RATTLE_PER_S / SR))


def pushes(s, blow_db):
    """Damped transient: the first shove of a heavy part is two waves that die within a few cycles."""
    t, out = np.arange(2000) / SR, np.zeros(N)
    for hz, cycles in ((220, 1.4), (640, 2.2)):
        wave = np.exp(-t * hz / cycles) * np.sin(2 * np.pi * hz * t)
        out += signal.oaconvolve(train(s, invert_db(blow_db(hz))), wave)[:N]
    return out


def thuds():
    """Impact on the bench: heavily damped dense overtones and the first shove."""
    dense = struck(*blow_spectra(KNOCKS, [250, 700, 2500], [0, 1, 2]), 170, 1.2, 1.0, 6.3)
    return invert_db(-10) * dense + pushes(*blow_spectra(KNOCKS, [250, 700], [0, 1]))


def plate(rub, held):
    """Modal ringing of the plate, struck and rubbed, under changing contact damping."""
    blows = blow_spectra(placed(CLANKS), [550, 880, 1500, 2100, 3000, 8000], [2, 3, 4, 0, 0, 1])
    return rung(*blows, PLATE_HZ, PLATE_MODES, invert_db(-1) * rub, 2.5, held, rub_hz=4740)


def cracks():
    """Impact noise of steel on steel: dense overtones at each clank."""
    return struck(*blow_spectra(CLANKS, [3000, 8000], [0, 1]), 2200, 0.87, 2.17, 1.8)


def housing(rub, held):
    """Modal ringing of the housing, struck and rubbed, under the same contact damping."""
    blows = blow_spectra(placed(RINGS), [804, 1130, 1680, 2760, 3330], [2, 3, 4, 0, 1])
    return rung(*blows, HOUSING_HZ, HOUSING_MODES, invert_db(-15) * rub, 1.8, held, rub_hz=4500)


def squeak():
    """Frequency modulation: a near-sine of wavering pitch and level."""
    s, hz, db = np.transpose(SQUEAK)
    t = np.arange(N) / SR
    level = np.sqrt(2) * invert_db(np.interp(t, s, db, -120, -120))
    return level * np.sin(2 * np.pi * np.cumsum(np.interp(t, s, hz)) / SR)


def scene():
    """Superposition: four ringing bodies, blows and sliding, then their reflections and the air."""
    low, body, mid, high = levels = slide_levels()
    t, rough = np.arange(N) / SR, grains(per_s=340, spread_db=2.5)
    rub = (rough + .8 * rattle()) * mid * (t > 1.8) * (t < 4.5)
    held = np.cumsum(np.interp(t, *np.transpose(GRIP))) / SR  # clock that runs fast under a firm grip

    direct = invert_db(-3) * sliding(rough, levels)
    direct += invert_db(-8.5) * bench(rough, low, t) + invert_db(-3.5) * boom(low)
    direct += invert_db(-1.0) * ticks() + invert_db(-0.5) * wheel(rough, mid, t)
    direct += thuds()
    direct += invert_db(-11.5) * plate(rub, held) + invert_db(-11) * cracks()
    direct += invert_db(-2.0) * housing(rub, held)
    direct += squeak()
    # a small bench radiates no deep bass
    direct = signal.sosfilt(signal.butter(6, 100, "high", fs=SR, output="sos"), direct)

    centre = direct + invert_db(-9) * reflections(direct, 0.23)
    side = colour(reflections(direct, .15), SIDE_SPECTRUM)
    return np.array([centre + side, centre - side]) + air()


def top_cut(x):
    """Nothing passes above the cut-off."""
    return signal.sosfilt(signal.butter(12, 15650, fs=SR, output="sos"), x)


def record(dry):
    """Dynamic compression lowers the loudest blows and lets go; a soft knee and band limits follow."""
    power_db = 10 * np.log10(signal.lfilter([.01], [1, -.99], (dry ** 2).mean(0)) + 1e-12)
    fall = np.arange(N) * 420.0 / SR  # recovery, dB a second
    peak_db = np.maximum.accumulate(power_db + fall) - fall
    over_db = np.maximum(peak_db + 15.0, 0)  # excess over -15 dB
    held = 1.046 * np.tanh(dry / invert_db(0.088 * over_db) / 1.203)
    held = signal.sosfilt(signal.butter(2, 50, "high", fs=SR, output="sos"), held)
    low_pass = signal.firwin(255, 15400, window=("kaiser", 6), fs=SR)
    held = signal.oaconvolve(held, low_pass[None], "same")
    return top_cut(held)


dry = scene()
out = record(dry)
materialize(out)
```